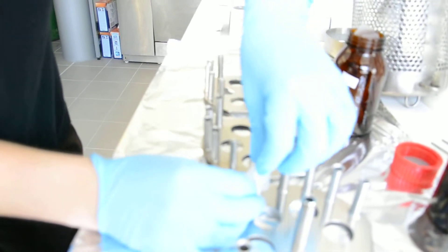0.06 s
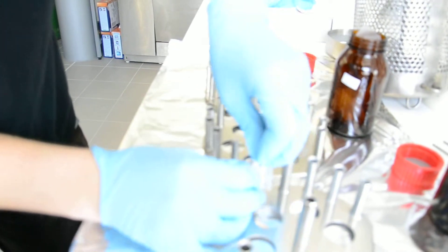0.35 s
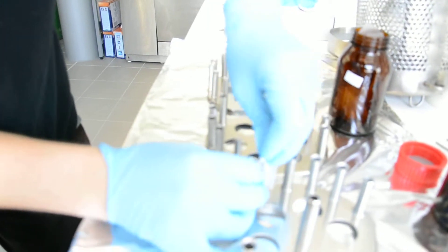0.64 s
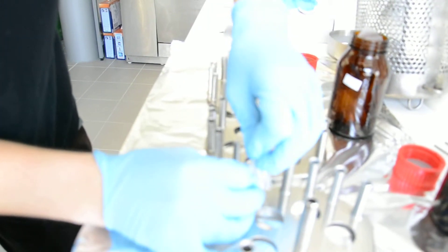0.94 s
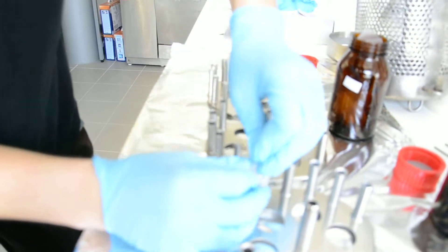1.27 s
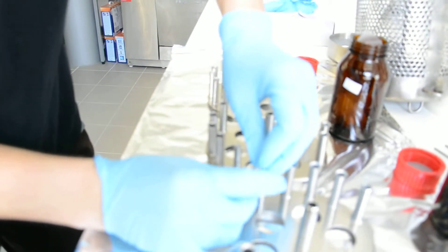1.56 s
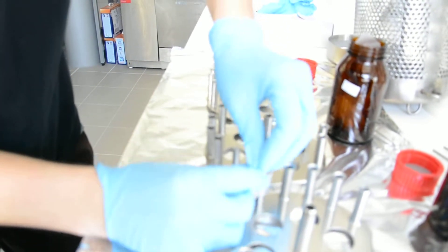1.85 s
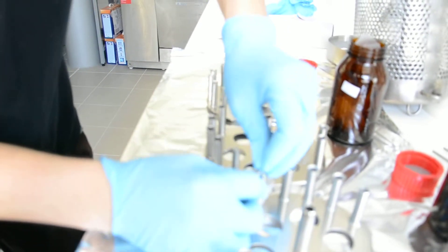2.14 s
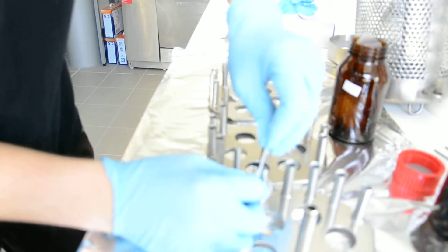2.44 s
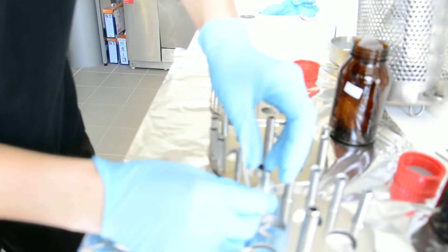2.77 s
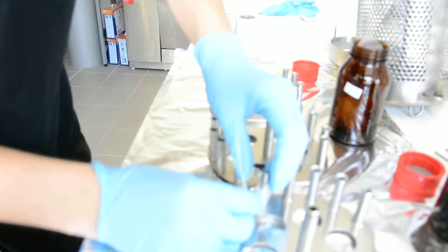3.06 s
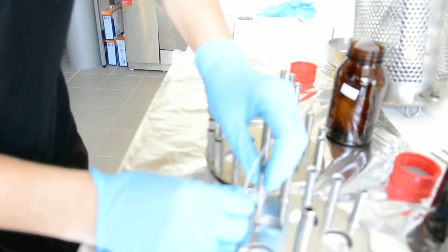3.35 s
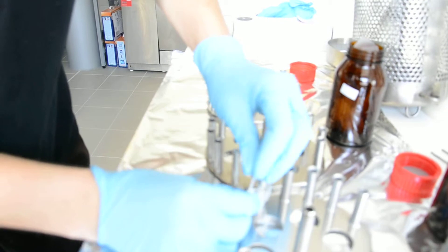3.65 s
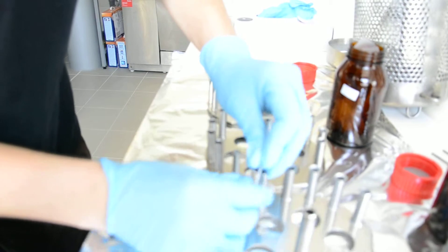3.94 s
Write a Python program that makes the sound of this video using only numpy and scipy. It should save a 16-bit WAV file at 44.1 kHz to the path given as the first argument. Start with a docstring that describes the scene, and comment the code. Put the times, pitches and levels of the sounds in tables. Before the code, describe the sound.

Rubber gloves and foil rustle close up in short, hissy, crinkling rubs, easing briefly near 1 second. Small parts tick between 2 and 2.5 seconds, sharpest at the start, while a tight rubbery twist creaks from 2.1 to 2.4. Rustling swells around 2.7, pauses, then returns with soft scuffs from 3.1 to 4. Throughout, a ventilation motor drones, throbbing and faintly whining over rushing air in a small room.

```python
"""Gloved fingers work small parts on a foil-covered lab bench. Rubber and foil rustle in short rubs
of hiss and crinkle, rubber scuffs on the parts, the parts tick, and one tight twist creaks as it
sticks and slips. A ventilation motor drones throughout, throbbing and whining with each turn of
its shaft, over a soft rush of air in a small hard room."""
import sys
import numpy as np
from scipy import signal
from scipy.fft import rfft, irfft, next_fast_len
from scipy.io import wavfile
from scipy.ndimage import map_coordinates

SR = 44100
rng = np.random.default_rng(int(sys.argv[2]) if len(sys.argv) > 2 else 0)


def digitize_waveform(pressure):
    """Quantize a signal to 16-bit integers and store it at the path in sys.argv[1].

    Rows of a 2-D input are taken as channels; values are limited to [-1, 1].
    """
    field = np.atleast_2d(pressure).T
    bounded = np.clip(field, -1, 1)
    quanta = np.round(bounded * 32767).astype(np.int16)
    wavfile.write(sys.argv[1], SR, quanta)


N = 176400
T = np.arange(N) / SR
SHAFT_HZ = 47.075


def amp(db):
    """Decibels to gain."""
    return 10 ** (np.asarray(db) / 20)


def unit(x):
    """Scale to rms 1."""
    return x / np.sqrt(np.mean(x ** 2) + 1e-20)


def wobble(rate):
    """A smooth random curve, rate knots a second."""
    return map_coordinates(rng.standard_normal(int(N * rate / SR) + 4), [T * rate])


def filtered(x, response):
    """Filter x by a gain given as a function of frequency."""
    size = next_fast_len(len(x) + 8192)
    return irfft(rfft(x, size) * response(np.fft.rfftfreq(size, 1 / SR)), size)[:len(x)]


def coloured(x, points):
    """EQ x with a curve of (f/Hz, level/dB) points on a log frequency axis."""
    freqs, db = np.transpose(points)
    return filtered(x, lambda hz: amp(np.interp(np.log(hz + 1), np.log(freqs), db)))


def bell(x, centre, width):
    """A Gaussian hump: a band in frequency or a swell in time."""
    return np.exp(-.5 * ((x - centre) / width) ** 2)


def burst(t60):
    """Noise that starts at once and dies away."""
    t = T[:SR // 2]
    return rng.standard_normal(len(t)) * amp(-60 * t / t60)


def decays(triggers, fall_s):
    """Give each trigger a tail that falls to a thousandth in fall_s."""
    return signal.lfilter([1], [1, -np.exp(-np.log(1000) / (fall_s * SR))], triggers)


def motor():
    """Shaft harmonics bunch into three throbs a turn, while the speed sways slightly."""
    # the drone's harmonics: multiple of the shaft rate, relative level/dB
    harmonics = [(1, -48), (2, -29), (3, -38.5), (4, -43.5), (5, -26), (6, -36.5), (7, -22), (8, -13.5),
                 (9, -17.5), (10, -21.5), (11, -14.5), (12, -27), (13, -36), (14, -14), (15, -20.5),
                 (16, -12.5), (17, -13), (18, -7), (19, -11), (20, -25.5), (21, -14), (22, -6), (23, -9.5),
                 (24, 0), (25, -32), (26, -15), (27, -15), (28, -15.5), (29, -23), (30, -31), (31, -37.5),
                 (32, -37.5), (33, -26.5), (34, -30.5), (35, -26.5), (36, -40.5), (37, -21.5), (38, -27),
                 (39, -37.5), (40, -33.5), (41, -22), (42, -25.5), (43, -29.5), (44, -49.5)]
    # throbs within one turn: position/turns, weight
    throbs = [(.206, .94), (.577, .9), (.832, 1.0)]
    drone_db, waver_db, lag_turns_per_order = -37.5, .46, .0132
    sway_hz, sway_turns, drift_turns = 5.88, .0013, .00025
    turns = SHAFT_HZ * T + sway_turns * np.sin(2 * np.pi * sway_hz * T) + drift_turns * wobble(2.8)
    loudest = max(harmonics, key=lambda row: row[1])[0]
    out = whines(turns)
    for order, db in harmonics:
        throb = sum(weight * np.exp(2j * np.pi * order * (turns - at)) for at, weight in throbs)
        lag = np.pi * lag_turns_per_order * (order - loudest) ** 2  # low harmonics arrive later
        gain = amp(drone_db + db + waver_db * wobble(5.05))
        out += gain * np.sqrt(2) * np.cos(np.angle(throb) + lag)
    return out


def whines(turns):
    """Clusters of uneven high shaft harmonics make thin whines, each swelling once a turn."""
    # whine bands: centre/Hz, width/Hz, swell position/turns, level/dB
    bands = [(2360, 98, .24, -61.5), (2897, 88, .3, -65.5), (4160, 120, .2, -64.5), (4552, 74, 0.54, -60.5),
             (6000, 130, .3, -67)]
    out = np.zeros(N)
    for centre, width, at, db in bands:
        orders = round(centre / SHAFT_HZ) + np.arange(-5, 6)
        scatter = .45 * rng.standard_normal((len(orders), 2)) @ [1, 1j]  # in strength and phase
        gains = bell(orders * SHAFT_HZ, centre, width) * (1 + scatter)
        cluster = sum(abs(gain) * np.cos(2 * np.pi * order * (turns - at) + np.angle(gain))
                      for order, gain in zip(orders, gains))
        out += amp(db) * unit(cluster)
    return out


def ventilation():
    """A bed of rushing air and a few faint, wavering hums."""
    # hums in the room: f/Hz, level/dB
    tones = [(100, -76.5), (296, -65), (381.8, -63.5), (434.5, -58), (447, -60.5), (585, -58.5), (866, -57),
             (1170, -57), (1183, -61.5)]
    # colour of the air: f/Hz, relative level/dB
    air_eq = [(20, -40), (40, -19), (62, -13.5), (130, 0), (400, 4), (1150, 6), (1600, 0.5), (2200, -2.5),
              (3400, -7.5), (6000, -8.5), (7900, -15.5), (9500, -9), (11500, -32)]
    air_db = -45.5
    hums = sum(amp(db) * unit(np.sin(2 * np.pi * hz * T + .5 * wobble(4.08))) for hz, db in tones)
    return hums + amp(air_db) * unit(coloured(rng.standard_normal(N), air_eq))


def rustles():
    """Each rub swells and fades: sliding hiss and tiny crinkles, flaring whenever the foil buckles."""
    # rubs of glove and foil: peak t/s, rise/s, fall/s, relative level/dB
    rubs = [(0.024, 0.084, 0.077, -36.5), (0.075, 0.018, 0.088, -38), (.22, 0.065, 0.048, -42.5),
            (.382, 0.014, 0.021, -39), (.412, 0.0072, 0.02, -38), (.485, 0.014, .08, -39),
            (.51, 0.075, 0.15, -44.5), (.568, .02, 0.058, -41), (.688, 0.0066, 0.066, -45),
            (.902, .01, 0.02, -51), (1.0, .02, .05, -54), (1.079, 0.006, 0.03, -42.5),
            (1.096, 0.016, 0.012, -36.5), (1.205, 0.084, 0.096, -39.5), (1.245, 0.036, 0.078, -40),
            (1.34, 0.082, 0.059, -34), (1.495, 0.037, 0.052, -50.5), (1.523, .012, 0.029, -42.5),
            (1.56, 0.019, 0.026, -36.5), (1.615, 0.0065, 0.054, -36.5), (1.648, 0.045, 0.025, -36),
            (1.70, 0.065, 0.15, -45.5), (1.765, .03, 0.022, -40.5), (1.798, 0.013, .06, -39),
            (1.885, 0.11, 0.13, -37.5), (1.935, 0.12, 0.16, -36.5), (1.987, .02, 0.046, -48),
            (2.015, 0.0057, 0.018, -29), (2.037, 0.011, 0.068, -38.5), (2.148, 0.043, .05, -37),
            (2.19, 0.038, 0.045, -36.5), (2.273, 0.012, 0.018, -31), (2.425, 0.024, 0.073, -41),
            (2.554, 0.017, 0.11, -38), (2.58, .03, 0.087, -39), (2.607, .04, 0.087, -35.5),
            (2.632, .03, 0.055, -38), (2.655, 0.023, .08, -33), (2.681, 0.035, 0.038, -30.5),
            (2.73, 0.034, 0.091, -42.5), (2.782, 0.012, 0.039, -36.5), (3.117, 0.031, 0.098, -44),
            (3.155, 0.063, .14, -45), (3.22, .012, 0.024, -44), (3.26, 0.019, .06, -38.5),
            (3.288, .035, 0.075, -34), (3.315, 0.033, 0.038, -36.5), (3.37, .04, 0.061, -46.5),
            (3.43, 0.028, 0.067, -45), (3.47, .05, 0.035, -38.5), (3.567, 0.017, 0.077, -35),
            (3.596, 0.079, 0.094, -35), (3.66, .04, 0.13, -49.5), (3.717, 0.034, 0.022, -44),
            (3.835, .06, 0.054, -40), (3.856, .015, 0.08, -40), (3.95, 0.0072, .1, -43),
            (3.995, 0.044, .08, -43.5)]
    # colour of the rustle: f/Hz, relative level/dB
    rustle_eq = [(200, -20), (1000, -13.5), (2000, -9.5), (3200, -9.5), (5000, -7), (7000, -2),
                 (7900, -6.5), (8600, 0.5), (9600, 1.5), (10500, -5.5), (11400, -22.5)]
    range_db, trim_db = 24, 1.5  # each rise and fall spans range_db
    crinkles_per_s, spread_db, crinkle_share = 2600, 3.5, .48
    buckles_per_s, buckle_t60_s, buckle_power = 140, .082, 3
    power = np.zeros(N)
    for peak, rise, fall, db in rubs:
        power += amp(db - range_db * np.maximum((peak - T) / rise, (T - peak) / fall)) ** 2
    crinkles = (rng.random(N) < crinkles_per_s / SR) * rng.choice([-1, 1], N)
    crinkles = crinkles * amp(spread_db * np.clip(rng.standard_normal(N), -2, 2))
    hiss = rng.standard_normal(N)
    grain = np.sqrt(crinkle_share) * unit(crinkles) + np.sqrt(1 - crinkle_share) * hiss
    buckles = rng.random(N) < buckles_per_s / SR
    flare_power = 1 + buckle_power * decays(buckles, buckle_t60_s / 2)  # power falls twice as fast
    envelope = amp(trim_db) * np.sqrt(power) * unit(np.sqrt(flare_power))
    return envelope * unit(coloured(grain, rustle_eq))


def scuffs():
    """Rubber drags on the parts in soft puffs of friction noise, duller than the foil."""
    # scuffs of rubber: peak t/s, length/s, centre/Hz, level/dB
    puffs = [(.372, 0.023, 2750, -51), (1.695, .03, 2500, -51), (2.01, .03, 4500, -52),
             (2.127, .015, 4000, -49), (2.572, 0.024, 3850, -51), (2.743, .008, 2600, -47),
             (3.14, 0.034, 3000, -50), (3.265, 0.027, 4240, -45), (3.33, .025, 6100, -50),
             (3.375, 0.031, 4300, -49)]
    out = np.zeros(N)
    for peak, length, centre, db in puffs:
        friction = filtered(rng.standard_normal(N), lambda hz: bell(hz, centre, width=centre / 4))
        out += amp(db) * bell(T, peak, length / 2) * unit(friction)
    return out


def ticks():
    """A dry crack, then a short bright ring; the parts are too small to give any bass."""
    # ticks of the parts: t/s, relative level/dB, ring f/Hz
    hits = [(1.2445, -38, 9300), (2.0122, -23, 9400), (2.0695, -35, 7040), (2.1054, -31.5, 9200),
            (2.145, -31, 9300), (2.189, -44, 8500), (2.4493, -30.5, 6400)]
    crack_db, ring_floor_db, ring_width_hz, low_cut_hz = 4, -13, 840, 1800
    out = np.zeros(N + SR)
    for start, db, ring_hz in hits:
        ring = filtered(burst(t60=.033), lambda hz: amp(ring_floor_db) + bell(hz, ring_hz, ring_width_hz))
        tick = amp(crack_db) * burst(t60=.004) + 2 * ring
        out[round(start * SR):][:len(tick)] += amp(db) * tick
    return filtered(out[:N], lambda hz: (1j * hz / (low_cut_hz + 1j * hz)) ** 2)


def creak():
    """Rubber sticks and slips in small jerks, fastest late in the twist; each is a snap and a rasp."""
    # course of the twist: t/s, slip rate/Hz, level/dB
    twist = [(2.1, 105, -58), (2.13, 130, -47), (2.21, 108, -46), (2.25, 83, -47.5), (2.299, 95, -45.5),
             (2.335, 150, -45), (2.371, 170, -45.5), (2.41, 110, -52), (2.44, 110, -63)]
    # colour of a slip: f/Hz, relative level/dB
    slip_eq = [(500, -20), (1800, -1), (2500, 9), (3000, 5), (3500, -3), (5000, 1), (6400, -2), (7200, 5),
               (7800, -5), (8700, 4), (9900, 5), (11400, -21)]
    jitter_s = .0001
    times, rate, db = np.transpose(twist)
    slip_count = np.cumsum(np.interp(T, times, rate, left=0, right=0)) / SR
    slips = np.flatnonzero(np.diff(np.floor(slip_count)))
    hiss = rng.standard_normal(N)
    jittered = slips + jitter_s * SR * rng.standard_normal(len(slips))
    snaps = np.bincount(jittered.astype(int), minlength=N)
    rasp = hiss * decays(snaps, fall_s=.016)
    jerks = coloured(unit(rasp) + unit(snaps), slip_eq)
    return amp(np.interp(T, times, db)) * jerks / jerks[slips[0]:slips[-1]].std()


def scene():
    """The hands close up with a touch of room, over the steady machinery."""
    room_db = -12
    hands = rustles() + scuffs() + ticks() + creak()
    tail = burst(t60=.27)
    room = signal.fftconvolve(hands, tail / np.linalg.norm(tail))[:N]
    return (hands + amp(room_db) * room + motor() + ventilation())[None]


def record(dry):
    """A steep high cut takes the very top off the mix."""
    high_cut_hz = 11500
    return filtered(dry[0], lambda hz: 1 / np.sqrt(1 + (hz / high_cut_hz) ** 70))[None]


dry = scene()
out = record(dry)
digitize_waveform(out)
```